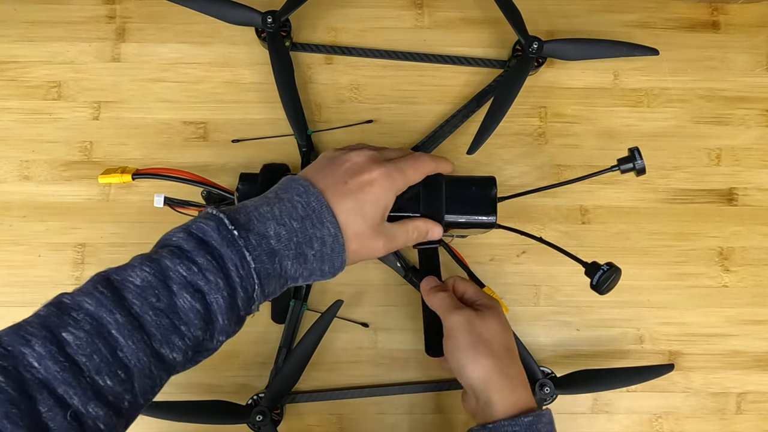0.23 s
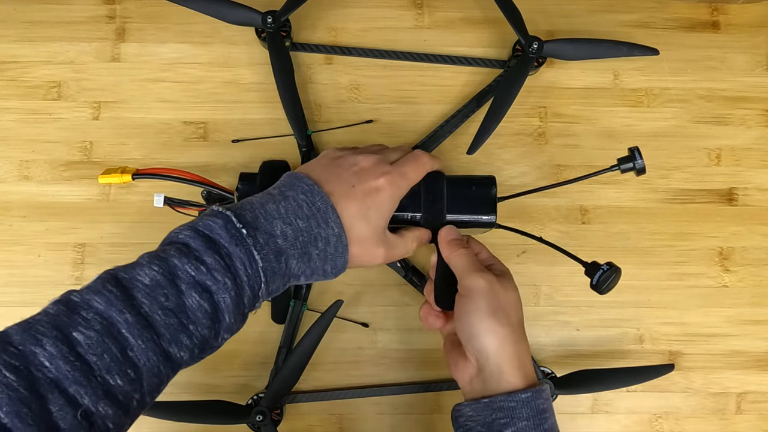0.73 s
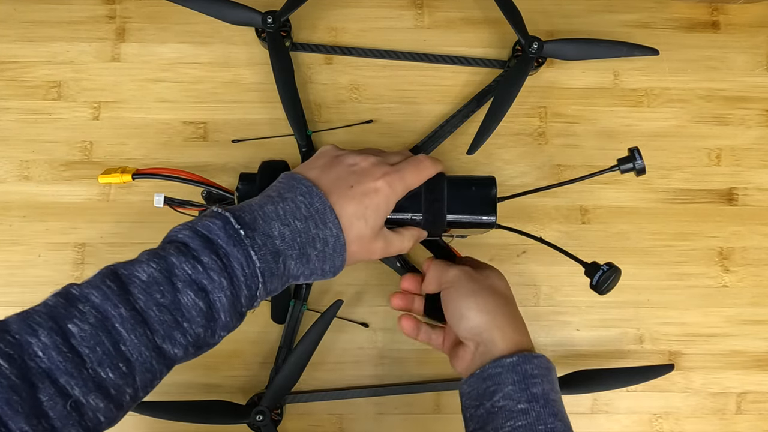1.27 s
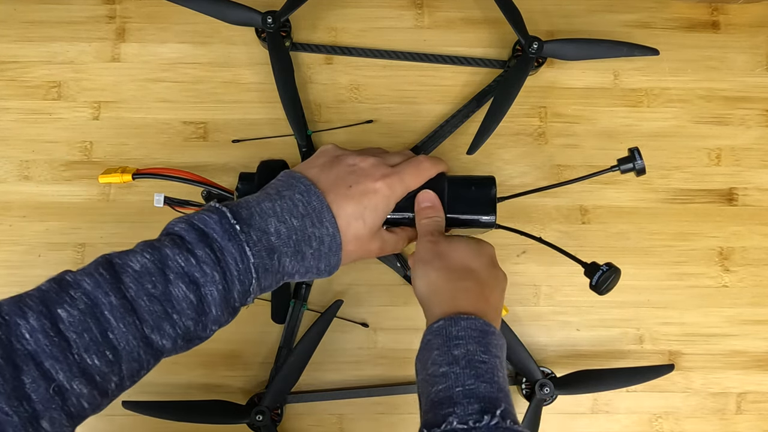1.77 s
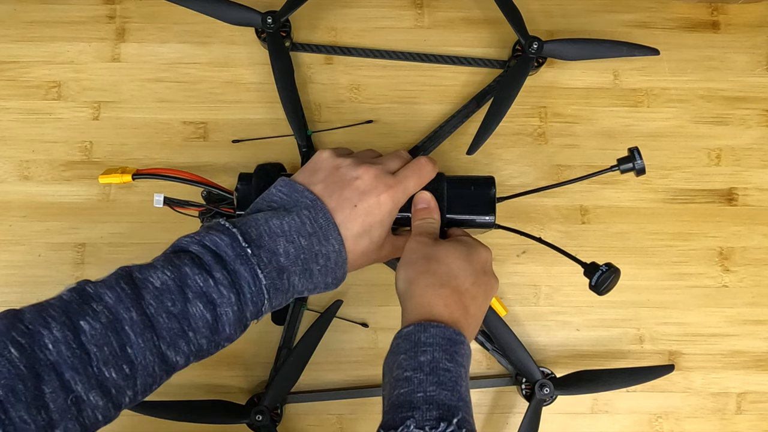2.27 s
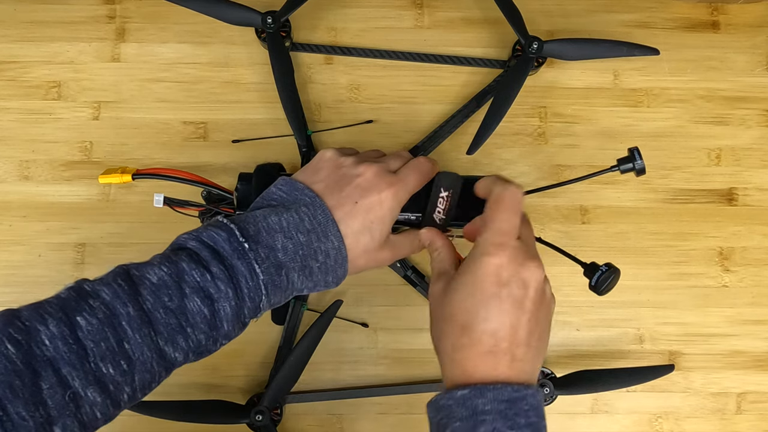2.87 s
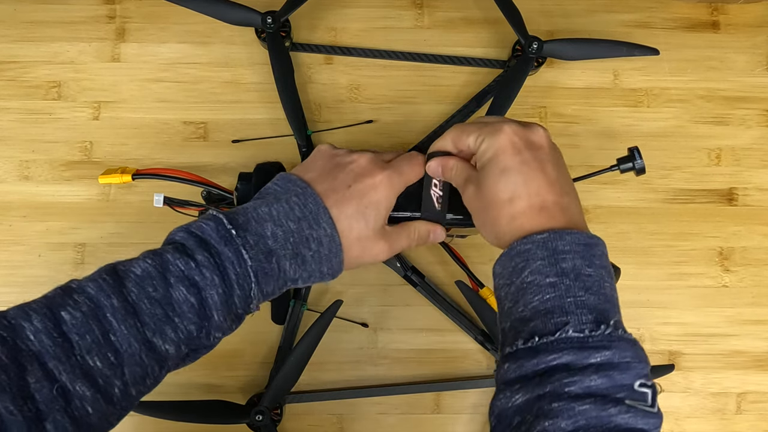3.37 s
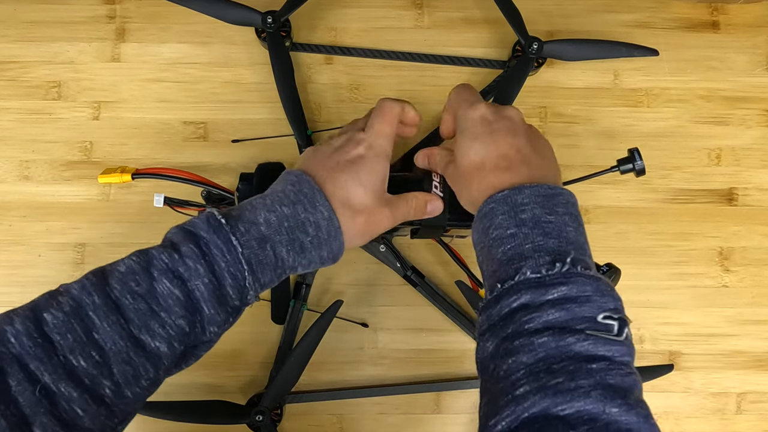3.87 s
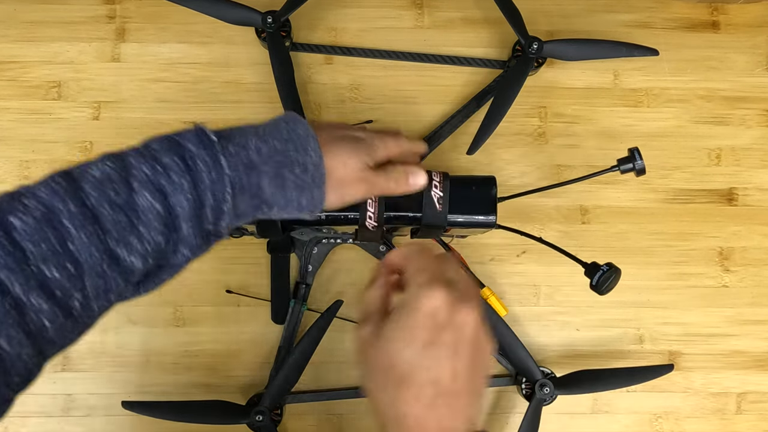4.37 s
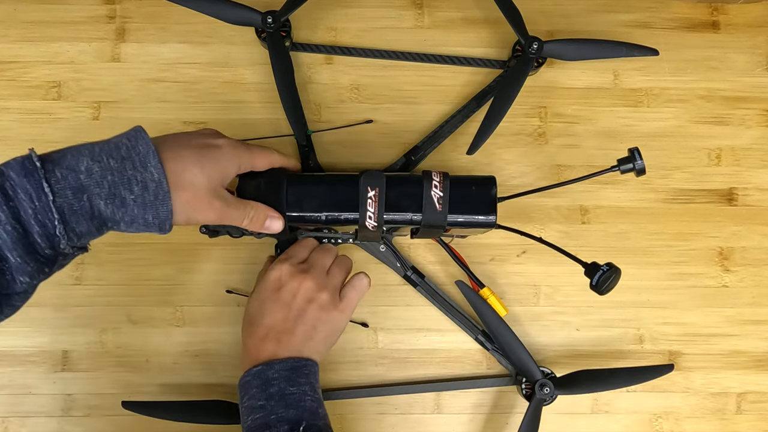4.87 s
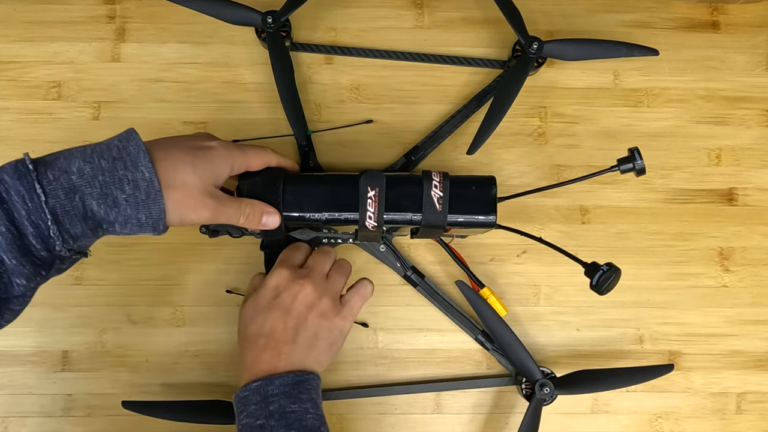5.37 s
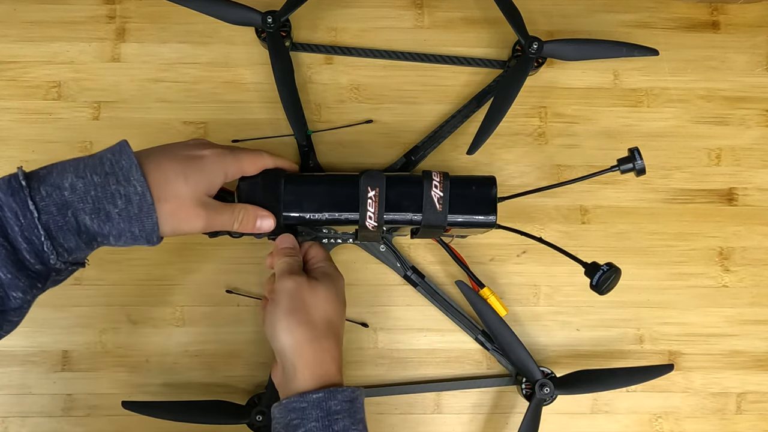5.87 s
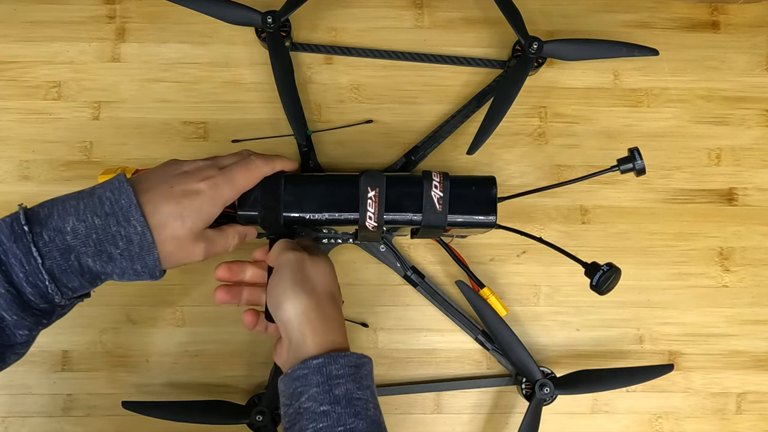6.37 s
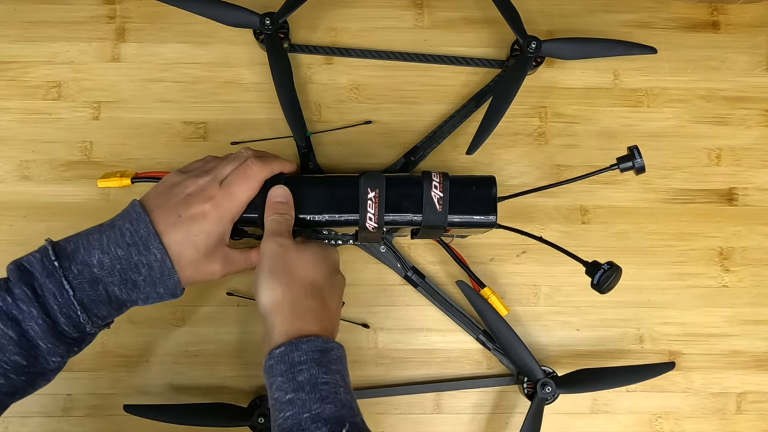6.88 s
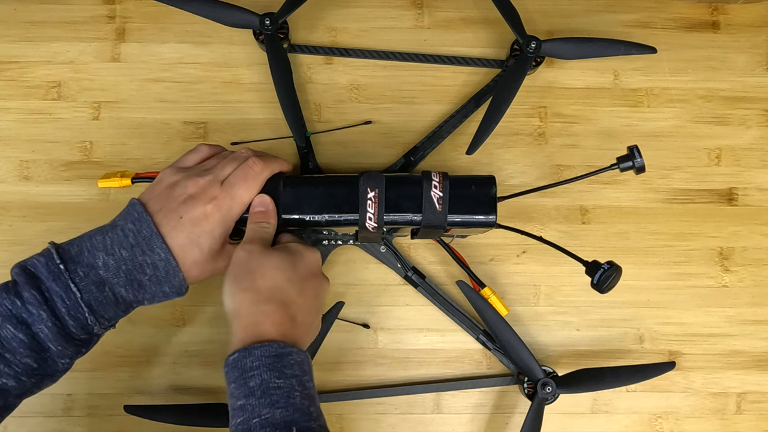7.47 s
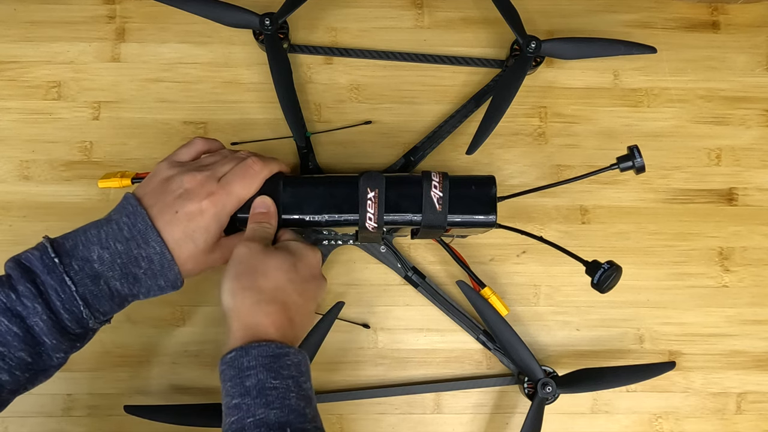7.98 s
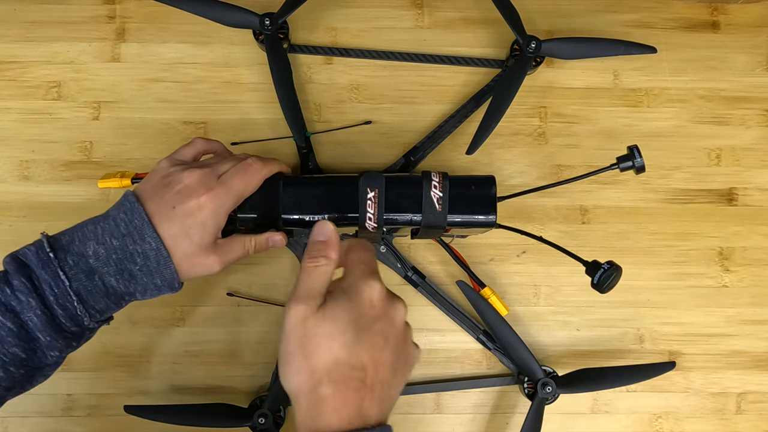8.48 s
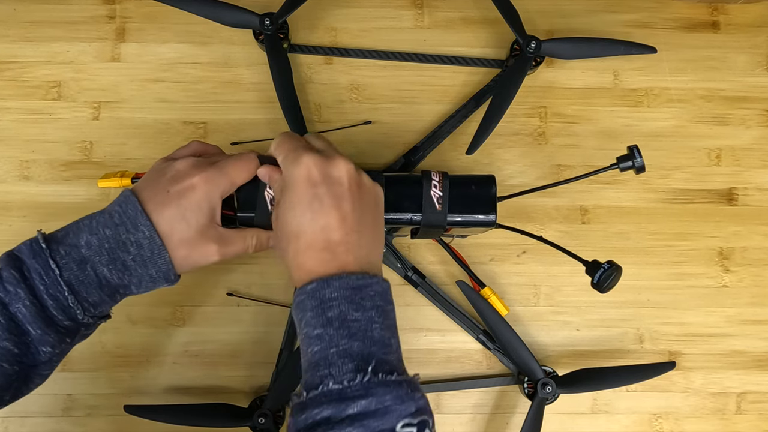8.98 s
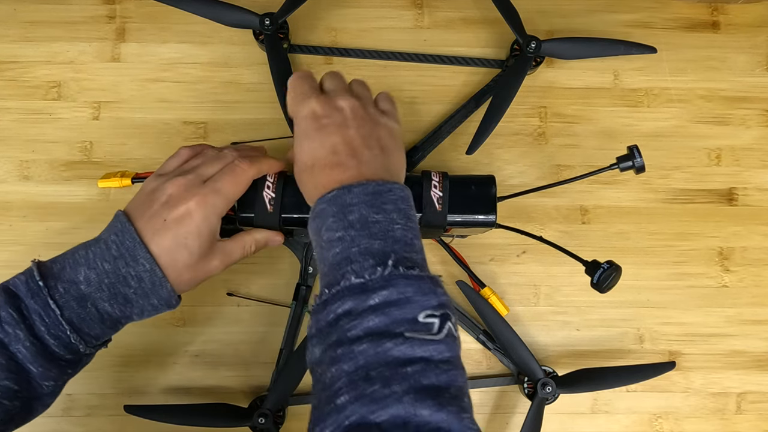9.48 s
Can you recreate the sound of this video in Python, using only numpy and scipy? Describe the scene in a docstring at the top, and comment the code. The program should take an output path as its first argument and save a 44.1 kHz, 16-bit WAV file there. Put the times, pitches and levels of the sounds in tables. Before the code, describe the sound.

A close stereo microphone in a small quiet room hears hands working hook-and-loop straps around a battery on a stiff drone frame, on a wooden desk. It opens with muffled rubs and small dull knocks until 0.7 s. At 1.05-1.5 s a bright crackling peel breaks into sharp snaps; quieter fiddling follows, with short rasps near 2.5 s. After a lull around 3 s, scratchy tugs and clicks run from 3.25 to 4.5 s, with a hollow frame knock at 4.2. At 5.0 s comes a strong zip-like scratch, then a hard clattering knock at 5.2 and a thick rasp at 5.5-5.8. Ticks and short rubs continue to a piercing snap at 7.0 s. It grows sparse, with a soft falling scrape at 8.2-8.45, then a loud short rip at 9.35 s, fading into light rubbing by 9.7. Faint low rumble and hum persist throughout.

```python
"""Hook-and-loop straps round a battery

Straps are threaded, pulled tight, peeled and pressed shut round a battery on a stiff frame on a wooden desk.
The hooks rasp in swarms of tiny clicks, shaped in pitch and loudness by each stroke of the hand.
Sharp clicks with a brief chatter make the snaps and buckles; decaying tones let the frame knock dully.
Filtered noise makes the soft brushes and the low rumble; a close stereo microphone hears it in a small room."""
import sys
import numpy as np
from scipy import signal
from scipy.fft import rfft, irfft
from scipy.io import wavfile
from scipy.ndimage import uniform_filter1d

SR = 44100
rng = np.random.default_rng(int(sys.argv[2]) if len(sys.argv) > 2 else 0)


def to_wav(sig):
    """Store sig (one row per channel, or 1-D mono) as 16-bit WAV at the path in sys.argv[1].

    Samples outside -1..1 are clipped; the rate is SR.
    """
    pcm = np.clip(np.atleast_2d(sig), -1, 1) * 32767
    pcm = np.round(pcm).astype(np.int16)
    wavfile.write(sys.argv[1], SR, pcm.T)  # frames by channels


N = 428648


def gain_of(db):
    """Turns decibels into a factor for the waveform."""
    return 10 ** (np.asarray(db) / 20)


def evened(x):
    """Scales a sound to an rms (average strength) of 1."""
    return x / np.sqrt(np.mean(x ** 2) + 1e-20)


def read(points, hz):
    """Reads a spectrum whose points are joined by straight lines over log frequency."""
    f, value = np.transpose(points)
    return np.interp(np.log(hz + 1), np.log(np.sort(f) + 1), value)


def follow(rows, t):
    """Reads every column of a curve at the times t."""
    s, *columns = np.transpose(rows)
    return [np.interp(t, s, c) for c in columns]


def coloured(x, points):
    """Filters a sound by a fixed spectrum."""
    spectrum = rfft(x)
    gain = gain_of(read(points, np.fft.rfftfreq(N, 1 / SR)))
    return irfft(spectrum * gain, N)


def add(mix, s, sound):
    """Mixes a sound in at s seconds."""
    part = mix[max(round(s * SR), 0):][:len(sound)]
    part += sound[:len(part)]


def wander(hz):
    """Random curve of rms 1: hz random points a second, joined by straight lines."""
    knots = rng.standard_normal(N // 20)
    return evened(np.interp(np.arange(N) * hz / SR, np.arange(len(knots)), knots))


def gesture(age, length, attack_s, sag_db_per_s, release_s):
    """Strength of a hand movement: a smooth attack, a slowly sagging hold, a fading release."""
    rise = np.sin(np.pi / 2 * np.clip(age / attack_s, 0, 1)) ** 2
    held = rise * gain_of(-sag_db_per_s * np.clip(age, 0, length))
    return held * np.exp(-np.maximum(age - length, 0) / release_s)


def strap(level_db=-0.5, clump_db=1.22, patchy_db=2.5):
    """Fine fibres and coarser hooks let go in clumps; a taut strap sounds brighter and drives the frame."""
    # A fast peel is an even roar, a slow one lets single hooks stand out: rasp level/dB, coarse hooks/dB
    coarseness = [(-65, -0.5), (-50.5, -3), (-31.5, -10.5)]
    # Relative spectrum of the rasp: f/Hz, level/dB
    rasp = [(100, -41), (200, -4), (340, -9), (600, -12.5), (800, -21.5), (1350, 0), (2300, 1), (3100, 5),
            (5300, 2), (7200, 3), (8300, -3.5), (9200, -5), (12500, -16.5), (14000, -22.5), (15800, -57)]
    # Resonances that colour the rasp: f/Hz, width/Hz, boost/dB
    body = [(703.6, 50, 14.5), (1013, 200, 10.5), (1446, 27, 4), (1630, 33, 4.5), (2015, 80, 4),
            (2680, 120, -2), (4340, 200, 0.5)]
    peel_level = rasp_level(np.arange(0, N, 64) / SR)
    coarse = gain_of(follow(coarseness, peel_level)[0]).repeat(64)[:N]
    big_hooks = hooks(per_s=240, spread_db=4.0, most=2.6)
    clicks = hooks(per_s=7000, spread_db=2.5, most=2.7) + coarse * big_hooks
    # the mix of fine and coarse keeps an even strength before it clumps
    clicks = evened(clicks / np.hypot(1, coarse) * gain_of(clump_db * wander(hz=128.6)))

    # work on short slices of time, each split into frequencies
    hz, t, z = signal.stft(clicks, SR, nperseg=512, noverlap=384)
    resonances_db = sum(db / (1 + (2 * (hz - f) / width) ** 2) for f, width, db in body)
    colour = gain_of(read(rasp, hz) + resonances_db)
    colour /= np.sqrt(np.mean(colour ** 2))
    # random patches of time and frequency make the rasp a little louder or softer
    patches = uniform_filter1d(rng.standard_normal(z.shape), size=7, axis=0)
    patches = evened(uniform_filter1d(patches, size=12, axis=1))
    z = z * colour[:, None] * pulling(hz, t)
    z = z * gain_of(level_db + glides(hz, t) + patchy_db * patches)
    return signal.istft(z, SR, nperseg=512, noverlap=384)[1][:N]


def hooks(per_s, spread_db, most):
    """A random train of tiny releases, a few much larger than the rest."""
    size = gain_of(spread_db * np.minimum(rng.exponential(1, N), most))
    released = rng.random(N) < per_s / SR
    return evened(size * rng.choice([-1, 1], N) * released)


def pulling(hz, t):
    """Strength of the rasp by frequency and time: the strokes on top of a light rub."""
    # Pulls, peels and rubs of a strap: start/s, length/s, level/dB, brightness/dB per octave,
    # drag on the frame/dB (see tautness), focus round 4 kHz/dB
    strokes = [(-0.03, 0.094, -49.5, -3, 8, -5), (0.06, 0.14, -53, 1, 9.5, -8),
               (0.281, 0.042, -48.5, -2.5, 15.5, -4.5), (0.353, 0.09, -50.5, -1.5, 8, -4.5),
               (0.486, 0.047, -57.5, 3.5, 0, -11), (0.876, 0.14, -62, -5, 3.5, 1),
               (0.982, 0.081, -57, 1, 4, -3.5), (1.05, 0.19, -49, 4, 12.5, -2),
               (1.285, 0.051, -41, 5.5, 12.5, -1), (1.386, 0.055, -45, 3.5, 21, 10),
               (1.465, 0.019, -40.5, -2, 10, 4), (1.697, 0.031, -51, 1.5, 4, 0),
               (2.006, 0.073, -73, -2, 2, 14), (2.5, 0.081, -42, -0.5, -13, 6.5),
               (2.57, 0.054, -45.5, 1.5, 11, 4), (2.63, 0.078, -49, -2.5, -5, 0),
               (3.101, 0.057, -56.5, 1.5, 11, -5), (3.257, 0.043, -53.5, 2, 2, -10.5),
               (3.365, 0.14, -63, 5, 14, -10), (3.478, 0.09, -45, 2.5, 5, -2.5),
               (3.709, 0.11, -53.5, 4, -4, -1.5), (3.87, 0.053, -49, 2.5, 4, -4),
               (3.953, 0.075, -56.5, 3, -12, -7), (4.105, 0.047, -51, 0, -1, -9.5),
               (4.195, 0.17, -59.5, -2, 1, -4.5), (4.345, 0.088, -51, -1, -14, -1.5),
               (4.386, 0.066, -43, -2.5, 3, -1), (4.902, 0.1, -53.5, -4, 3, 1),
               (5, 0.023, -35.5, -0.5, -5, -4.5), (5.082, 0.036, -58, -10.5, 7, 6.5),
               (5.195, 0.084, -62.5, -8, 15.5, -2.5), (5.486, 0.075, -48, -10.5, 10, 7),
               (5.6, 0.11, -45, -5.5, 6, 3), (5.659, 0.12, -40.5, -4, 18.5, 7.5),
               (5.892, 0.054, -49, 0, 10, 2), (5.951, 0.083, -46, -2, -3, 6.5),
               (6.112, 0.081, -52, 1.5, 1, -0.5), (6.266, 0.058, -46.5, -2, 7, 5.5),
               (6.565, 0.062, -55, -2, 14, 2.5), (6.641, 0.063, -49.5, 3, -8, 5),
               (6.956, 0.088, -46, -5.5, -1, 11), (7.043, 0.18, -56, -0.5, -5, 10),
               (7.298, 0.08, -48, -1, -13, 4), (8.057, 0.15, -63, 18, 6, 35),
               (8.172, 0.12, -54.5, 4.5, -4, -1.5), (8.262, 0.13, -50, -0.5, -20, 3),
               (8.397, 0.05, -57.5, 0.5, 2, 1), (8.848, 0.077, -69, -1, -1, -10),
               (9.051, 0.096, -58, 0.5, -3, -6.5), (9.152, .12, -56.5, 1.5, -19, -1),
               (9.318, 0.031, -50, 2.5, -8, -10.5), (9.348, 0.056, -35, 0.5, -7, -6),
               (9.52, 0.086, -58, 1, -9, -3)]
    # Between strokes the strap shifts lightly under the fingers: t/s, level/dB
    fidget = [(0, -62), (.55, -61), (.63, -74), (.85, -69.5), (1.35, -58), (1.85, -62), (2.68, -64),
              (2.97, -88), (3.2, -66.5), (3.95, -59), (4.48, -64), (4.78, -83.5), (5.0, -59), (6.5, -68),
              (7.42, -62.5), (7.95, -72), (8.5, -69.5), (8.8, -78.5), (9.45, -61.5), (9.72, -64)]
    # Colour of that light rub: brightness/dB per octave, drag/dB, focus/dB
    fidget_colour = (0.31, 5.2, -0.25)
    power = np.outer(tautness(hz, *fidget_colour), gain_of(follow(fidget, t)[0]) ** 2)
    for start, length, db, *grip in strokes:
        # a stroke gathers speed, holds while it slackens a little, and stops
        speed = gesture(t - start, length, attack_s=0.031, sag_db_per_s=11, release_s=0.013)
        power += np.outer(tautness(hz, *grip), (gain_of(db) * speed) ** 2)
    return np.sqrt(power)


def tautness(hz, tilt, drag_db, focus_db):
    """Power by frequency for one grip: brighter or duller, dragging on the frame, focused round 4 kHz."""
    octaves = np.log2((hz + 1) / 4000)
    low = read([(700, 0.75), (1500, 0)], hz)  # three quarters of the drag below 700 Hz, none above 1500 Hz
    focus = np.exp(-octaves ** 2) - 1
    return gain_of(tilt * np.clip(octaves, -1.6, 1.6) + drag_db * low + focus_db * focus) ** 2


def rasp_level(t):
    """How strongly the strap moves at the times t, in dB, taken at 4 kHz."""
    return 20 * np.log10(pulling(np.array([4000.]), t)[0])


def glides(hz, t, octaves=0.61):
    """As a strap is drawn out its free length grows and its resonance sinks; returns the change in dB."""
    # Draws of the strap: start/s, end/s, start f/Hz, end f/Hz, resonance over its surroundings/dB
    draws = [(1.392, 1.483, 6750, 4020, 2.5), (1.728, 1.792, 3550, 1490, 16),
             (8.194, 8.453, 4240, 1400, 6.5)]
    boost = np.zeros((len(hz), len(t)))
    for start, end, start_hz, end_hz, db in draws:
        centre = np.interp(t, [start, end], np.log2([start_hz, end_hz]))
        fade = np.clip(np.minimum(t - start, end - t) / 0.012 + .5, 0, 1)
        hump = np.exp(-((np.log2(hz[:, None] + 1) - centre) / octaves) ** 2)
        boost += db * fade * (hump - .3)  # frequencies far from the resonance are lowered
    return boost


def stray_hooks(count=260, level_db=-8, spread_db=11, ceiling_db=-48, low_hz=3000, high_hz=11000):
    """Small single hooks tick at random, each with its own pitch; they follow the strap up to a ceiling."""
    out, draws = np.zeros(N), rng.random((count, 3))
    times = draws[:, 0] * N / SR
    levels = np.minimum(rasp_level(times), ceiling_db)
    for s, db, (_, size, pitch) in zip(times, levels, draws):
        centre_hz = low_hz * (high_hz / low_hz) ** pitch
        tick_db = db + level_db + spread_db * size ** 2
        add(out, s, crack(tick_db, centre_hz, octaves=0.82, chatter=0.00048, rattle=0.36, size=512))
    return out


def crack(db, hz, octaves, chatter, rattle=1.0, size=4096):
    """One sharp release, then chatter that swells and dies, through a broad resonance."""
    f, t = np.fft.rfftfreq(size, 1 / SR), np.arange(size) / SR
    log_gain = -np.log(1 + (np.log2((f + 1) / hz) / octaves) ** 2)
    log_gain -= np.log(1 + (180 / (f + 1)) ** 2) / 2  # less bass below 180 Hz
    # choose the phase so that the resonance starts at once and rings only afterwards
    circle = np.concatenate([log_gain, log_gain[-2:0:-1]])
    ping = np.fft.ifft(np.exp(np.conj(signal.hilbert(circle)))).real
    age = t / max(chatter, 1 / SR)
    drive = rng.standard_normal(size) * (1 - np.exp(-age / 0.17)) * np.exp(-age / 2.44)
    drive *= rattle / np.linalg.norm(drive)
    drive[0] += 1  # the sharp release itself
    sound = signal.fftconvolve(drive, ping)[:size]
    # db is the level of the whole crack's energy packed into 10 ms
    return gain_of(db) * sound / np.linalg.norm(sound) * np.sqrt(SR / 100)


def snaps(level_db=-1):
    """Single hooks tear loose and buckles tick, each a crack of its own pitch."""
    # Hooks and buckles letting go: t/s, level before level_db/dB, centre f/Hz,
    # half-width/octaves, chatter time scale/s
    releases = [(.529, -48.5, 4200, 0.73, 0.00088), (0.9745, -47, 2820, 1.2, 0.0031),
                (1.1927, -47, 5520, 0.84, 0.00043), (1.285, -32.5, 12500, 0.9, 0.0066),
                (1.3065, -33.5, 5760, 0.4, .006), (1.3192, -34, 5860, 0.49, 0.0061),
                (1.4237, -39.5, 5140, 0.18, 0.0016), (1.434, -38, 12100, 0.13, 0.0027),
                (1.464, -42, 4400, 0.27, 0.00065), (1.4875, -44, 4000, 3.6, 0.0026),
                (1.495, -37, 4400, 0.44, 0.00081), (1.61, -47, 3060, 0.22, .0015),
                (1.8687, -49.5, 5060, .6, 0.0011), (1.9957, -44, 5060, 1.1, 0.0028),
                (2.1536, -49, 4600, 3, 0.0025), (2.476, -48.5, 2700, 0.64, 0.0046),
                (2.505, -41, 3020, 0.6, 0.0014), (2.533, -41.5, 3930, 1.4, 0.0013),
                (2.618, -47, 7000, 0.58, 0.0011), (2.8186, -45, 2200, 2.2, 0.0015),
                (3.274, -45, 7060, 0.5, 0.0033), (3.2882, -40.5, 7450, 0.32, 0.0034),
                (3.6043, -44.5, 5640, .85, 0.00076), (3.7036, -47.5, 4600, 0.65, 0.0014),
                (3.768, -44, 6840, 0.33, 0.00028), (3.9085, -35, 2860, 1.8, 0.0045),
                (3.9188, -44.5, 1300, 0.83, 0.0016), (3.946, -41.5, 5470, 1.3, 0.00096),
                (4.053, -38.5, 6300, 1.6, 0.0012), (4.1414, -37.5, 3150, 1, 0.004),
                (4.399, -46, 5000, 1.2, .0012), (4.4757, -40, 3500, 1.4, 0.0019),
                (4.6227, -47, 2320, 0.92, 0.0023), (4.844, -64, 3350, 0.68, .002),
                (4.991, -40, 3340, 0.45, 0.0012), (5.007, -34, 2450, 0.87, 0.0037),
                (5.0247, -31.5, 2560, 0.22, 0.0029), (5.188, -40, 12500, 0.51, .003),
                (5.316, -33.5, 2260, 1.14, 0.0051), (5.351, -34, 2420, 1.1, 0.0041),
                (5.7715, -29.5, 4070, .66, .0018), (6.1588, -41, 10300, 0.33, .0008),
                (6.3398, -40.5, 6600, 0.96, 0.0079), (6.4046, -49.5, 7100, 0.41, 0.00043),
                (6.4338, -33.5, 7200, 1.13, 0.0059), (6.483, -46, 7650, 0.59, .0018),
                (6.562, -33.5, 6000, 1.7, 0.0035), (6.6818, -40.5, 3480, 0.47, 0.0058),
                (6.8734, -49, 4400, 0.3, 0.00099), (6.987, -24.5, 4800, 0.34, 0.00073),
                (6.9914, -36, 5100, 0.29, 0.0045), (7.261, -54.5, 3100, 0.39, .0015),
                (7.433, -50.5, 3200, 0.4, 0.0022), (8.2012, -39.5, 4540, 0.47, 0.002),
                (8.3561, -36.5, 4630, 0.32, 0.0059), (8.98, -57.5, 7800, .5, .002),
                (9.461, -45.5, 11200, .94, 0.00093), (9.526, -44.5, 6050, 1.4, 0.0016)]
    out = np.zeros(N)
    for s, db, hz, octaves, chatter in releases:
        # longer chatter is also stronger
        add(out, s, crack(db + level_db, hz, octaves, chatter, rattle=chatter / 0.001))
    return out


def knocks(level_db=-1, ring_db=0, rise=0.00047):
    """A hard contact chatters briefly, then the frame and the desk ring in decaying tones."""
    # Blows on the frame: t/s, level before level_db/dB, centre f/Hz, half-width/octaves,
    # chatter time scale/s, ring of frame and desk/dB
    blows = [(0.168, -41.5, 650.0, 6, 0.0048, -57.5), (0.318, -46, 700.0, 4.4, 0.0049, -52),
             (0.3983, -37, 1950, 1.2, 0.0025, -54.5), (0.6265, -40, 1450, 0.22, 0.0012, -66),
             (0.6737, -34.5, 1190, 0.81, 0.0038, -67), (1.456, -43.5, 2300.0, 0.22, 0.0027, -72),
             (1.5467, -47, 850, 0.48, 0.00059, -61), (1.7693, -48.5, 1470, 0.44, 0.00069, -58.5),
             (2.656, -43, 754, 3.4, 0.0012, -77), (3.7183, -49.5, 886.0, 2.8, 0.0027, -66),
             (3.859, -46, 1730, 0.75, 0.0013, -61), (4.188, -34.5, 2180, 0.76, 0.0026, -37),
             (5.1977, -29, 2130, 0.55, 0.0068, -58), (5.2041, -26, 1765.0, 2.3, 0.0012, -54),
             (5.2116, -33, 864, 1.8, 0.0037, -54), (5.234, -42, 900.0, 1, 0.0023, -51),
             (5.522, -37.5, 1270, 0.99, 0.0057, -62), (5.715, -33.5, 960, 1.15, 0.00094, -68),
             (5.746, -40.5, 685, 0.33, 0.005, -70), (6.5666, -37, 4059.0, 5.6, 0.0009, -51.5),
             (6.6085, -48, 1213, 2.2, 0.0012, -60), (7.0151, -39, 1200, 1.5, 0.0035, -52),
             (7.7307, -56.5, 1580, 0.59, 0.0011, -63.5), (8.3787, -44.5, 1415, 2, 0.0091, -65),
             (8.4391, -54, 1389.0, 0.24, 0.002, -76), (8.8773, -51, 600, 4.7, 0.003, -57),
             (9.0862, -45, 2020, 1.4, 0.0024, -66), (9.3932, -39.5, 1800, 1.2, 0.002, -51.5)]
    # Tones of the frame on the desk: f/Hz, level within the ring/dB, time to fall by 60 dB/s
    frame = [(146.5, -32, .2), (197.8, -1, 0.21), (312, -4.5, 0.071), (480, -9.5, 0.077),
             (644, -6.5, 0.085), (1080, -11, .09), (1409, 6, 0.052), (1640, -9, 0.13)]
    out, t = np.zeros(N), np.arange(SR // 2) / SR
    for s, db, hz, octaves, chatter, thud_db in blows:
        add(out, s, crack(db + level_db, hz, octaves, chatter, rattle=1.6))
        ring = np.zeros(len(t))
        for f, mode_db, t60 in frame:
            ring += gain_of(mode_db - 60 * t / t60) * np.sin(2 * np.pi * (f * t + rng.random()))
        add(out, s, gain_of(thud_db + ring_db) * ring * (1 - np.exp(-t / rise)))
    return out


def brushes(octaves=0.39):
    """Cuffs and palms slide over the battery case: soft hollow swells of noise round one pitch."""
    # Brushes: start/s, end/s, level before the swell/dB, centre f/Hz
    rubs = [(0.186, 0.241, -55.5, 463), (0.384, 0.438, -58, 570), (0.623, 0.659, -55.5, 407),
            (1.762, 1.797, -57.5, 420), (2.157, 2.282, -62.5, 343), (2.633, 2.7, -56, 623),
            (4.419, 4.668, -63.5, 398), (4.93, 5, -58, 560), (5.195, 5.226, -45, 370),
            (8.866, 8.94, -64.5, 328), (9.384, 9.431, -47, 820)]
    out, hz = np.zeros(N), np.fft.rfftfreq(SR, 1 / SR)
    for start, end, db, centre_hz in rubs:
        band = np.exp(-(np.log2((hz + 1) / centre_hz) / octaves) ** 2 / 2)
        rub = irfft(rfft(rng.standard_normal(SR)) * band, SR)
        swell = signal.windows.tukey(max(round((end - start) * SR), 2), .8)
        add(out, start, gain_of(db) * evened(rub)[:len(swell)] * swell)
    return out


def scatter(x):
    """Each hook lets go at another spot between the fingers, so the shortest waves dart left and right."""
    # Share of the sound that differs between the sides: f/Hz, level/dB
    share = [(300, -25.5), (2000, -7), (4000, -14.5), (7000, -17.5), (10000, -12), (12000, 1)]
    side = coloured(x * wander(hz=494), share)
    return np.array([side, -side])


def room(x, shift_hz=1.31, count=3):
    """Direct sound and reflections, whose pattern shifts as the arms move."""
    out = np.array([x, x])
    for k in range(count):
        # the echo patterns take turns while their total power stays even
        turn = np.cos(np.pi * (shift_hz * np.arange(N) / SR + k / count))
        share = np.sqrt(2 / count) * turn
        out += signal.fftconvolve((x * share)[None], echoes(), axes=1)[:, :N]
    return out


def echoes(early_db=-7, early_t60=0.03, early_apart=0.25, tail_db=-11, tail_apart=0.54):
    """Quick reflections from desk and frame, then the short tail of the room, for both sides."""
    # Fading of the tail: f/Hz, time to fall by 60 dB/s
    fading = [(150, 0.21), (600, 0.52), (2000, 0.68), (6000, 0.38), (14000, 0.41)]
    t, sides = np.arange(SR // 2) / SR, np.array([[1], [-1]])
    taps = rng.choice([-1., 1.], (4, len(t))) * (rng.random((4, len(t))) < 4000 / SR)
    early = (taps[0] + early_apart * sides * taps[1]) * gain_of(-60 * t / early_t60) * (t > .0007)
    late = (taps[2] + tail_apart * sides * taps[3]) * (t > .006)
    # each frequency of the tail fades at its own speed
    hz, age, z = signal.stft(late, SR, nperseg=256)
    z = z * gain_of(-60 * age / read(fading, hz)[:, None])
    tail = signal.istft(z, SR, nperseg=256)[1][:, :len(t)]
    early = gain_of(early_db) * early / np.linalg.norm(early[0])
    return early + gain_of(tail_db) * tail / np.linalg.norm(tail[0])


def thrum():
    """Hands rest or bear down and the frame flexes: low noise that grows with their load."""
    # Hands bear down: start/s, length/s, level/dB
    presses = [(-0.03, 0.21, -50.5), (0.62, 0.72, -51), (0.77, 0.64, -55), (1.458, 0.02, -47),
               (2.153, 0.06, -53), (3.01, 0.037, -55.5), (3.713, .23, -42), (4.245, 0.14, -52.5),
               (5.014, .06, -58.5), (7.65, 0.038, -50.5), (9.074, 0.072, -53), (9.375, 0.16, -43.5),
               (9.46, 0.23, -49.5)]
    # Resting weight of the hands: t/s, level/dB
    resting = [(0, -60), (3.5, -57), (4.8, -63.5), (6.3, -67), (8.5, -74.5), (9.72, -63)]
    # Relative spectrum of the thrum: f/Hz, level/dB
    spectrum = [(15, -17), (42, -13.5), (57, 7), (69, -2.5), (81, 3.5), (96, -1.5), (118, -21), (200, -35),
                (600, -72)]
    t = np.arange(N) / SR
    load = gain_of(follow(resting, t)[0]) ** 2
    for start, length, db in presses:
        press = gesture(t - start, length, attack_s=0.026, sag_db_per_s=12.5, release_s=0.012)
        load += (gain_of(db) * press) ** 2
    return np.sqrt(load) * murk(spectrum, apart=0.039)


def hum(hum_db=0):
    """Hollow low hum of the room: noise strongest round 150 Hz, its level slowly changing."""
    # Level of the hum: t/s, level/dB
    level = [(0, -54), (.3, -61.5), (1.1, -59), (1.4, -64.5), (2.7, -62.5), (3.0, -57.5), (4.3, -60.5),
             (5.6, -63.5), (6.0, -67), (8.3, -70.5), (8.8, -62), (9.72, -65.5)]
    # Relative spectrum of the hum: f/Hz, level/dB
    spectrum = [(60, -1), (120, -8.5), (149, 9), (172, -3), (198, 0.5), (240, -8.5), (320, -8.5),
                (460, -14.5), (800, -81), (3000, -48)]
    t = np.arange(N) / SR
    return gain_of(hum_db + follow(level, t)[0]) * murk(spectrum, apart=0.078)


def rumble(rumble_db=-55, sway_db=3.5):
    """Deep noise whose level sways at random."""
    # Relative spectrum of the rumble: f/Hz, level/dB
    spectrum = [(8, -7.5), (26, 7.5), (45, -4.5), (62, -33.5), (78, -32), (94, -6), (120, -20.5),
                (200, -32), (500, -60.5), (2000, -93.5)]
    return gain_of(rumble_db + sway_db * wander(hz=2.8)) * murk(spectrum, apart=0.03)


def hush(hiss_db=-69):
    """Steady, wide noise: the hush of the room."""
    # Relative spectrum of the hush: f/Hz, level/dB
    spectrum = [(20, -3), (200, 5.5), (500, -1.5), (1000, -6), (2000, -21.5), (7500, -12), (10000, -18),
                (14000, -28), (16000, -56)]
    return gain_of(hiss_db) * murk(spectrum, apart=0.92)


def murk(spectrum, apart):
    """Stereo noise of rms 1; apart weighs the part that differs between the sides."""
    common, side = rng.standard_normal((2, N))
    return evened(coloured(np.array([common + apart * side, common - apart * side]), spectrum))


def scene():
    """Straps and frame in the room, over the low background."""
    # Snaps and knocks are soft in the highest treble: f/Hz, level/dB
    dulling = [(100, 3.5), (1000, -1.5), (4000, -2.5), (7200, 1.5), (9500, -4.5), (12500, -12.5),
               (14000, -17), (15800, -35)]
    sharp = coloured(snaps() + stray_hooks() + knocks(), dulling)
    handling = strap() + brushes() + sharp
    background = rumble() + thrum() + hum() + hush()
    return room(handling) + scatter(handling) + background


def record(dry):
    """The two microphone capsules differ a little in colour and phase; then the top treble is cut off."""
    # Left over right: f/Hz, level/dB
    balance = [(60, 0.5), (500, -2.8), (1200, 0.3), (2500, -0.5), (5000, 0), (8500, 0.7), (11500, 2.5),
               (14500, 3)]
    # The left capsule lags behind the right: f/Hz, phase/radians
    left_lag = [(300, 0), (1000, 0.15), (2500, 0.029), (4000, 0.12), (6000, 0.029), (10000, 0.033),
                (11500, .4)]
    edge_hz = 15900
    hz, sides = np.fft.rfftfreq(N, 1 / SR), np.array([[.5], [-.5]])  # half of each difference per side
    gain = gain_of(sides * read(balance, hz))
    lag = np.exp(-1j * sides * read(left_lag, hz))
    pair = irfft(rfft(dry) * gain * lag, N)
    low_pass = signal.firwin(511, edge_hz, window=("kaiser", 9), fs=SR)
    return signal.oaconvolve(pair, low_pass[None], "same")


dry = scene()
out = record(dry)
to_wav(out)
```